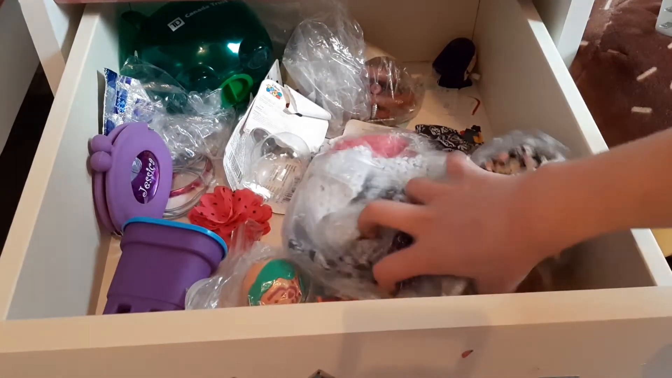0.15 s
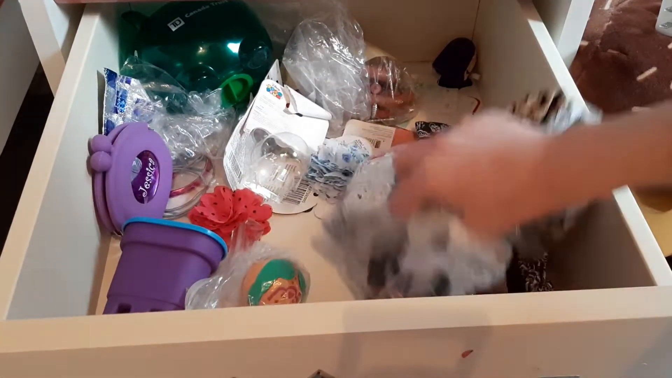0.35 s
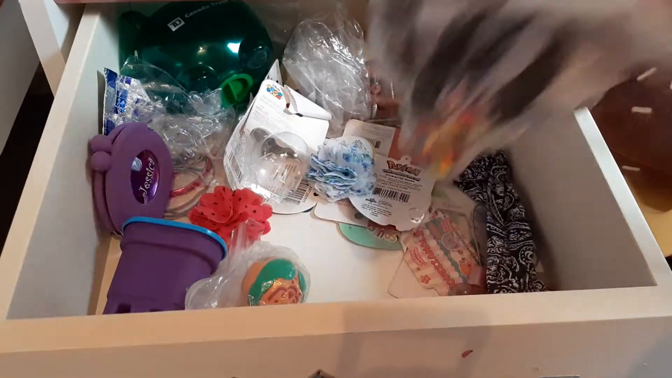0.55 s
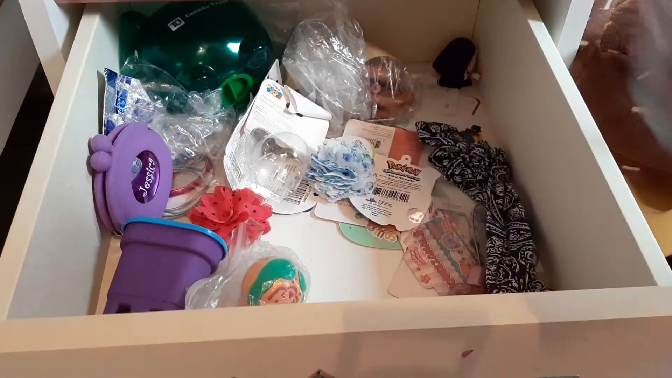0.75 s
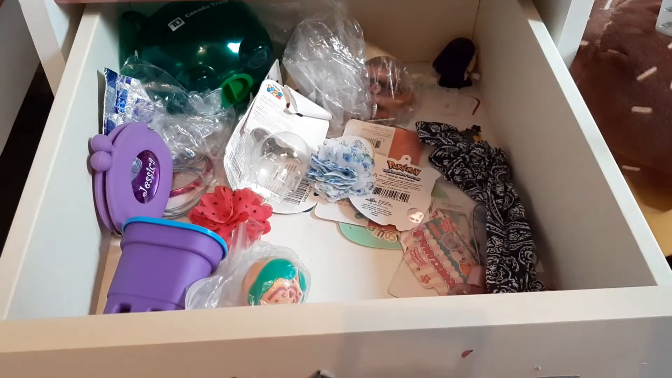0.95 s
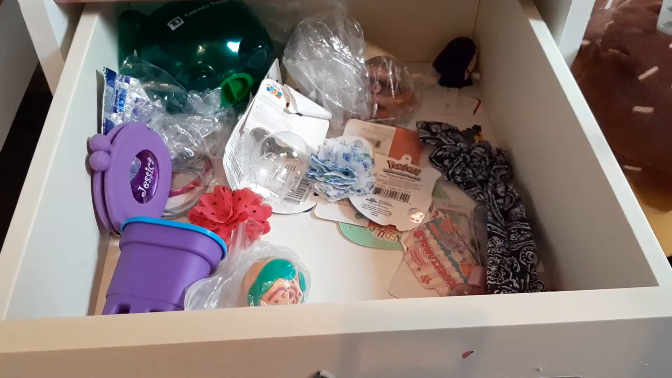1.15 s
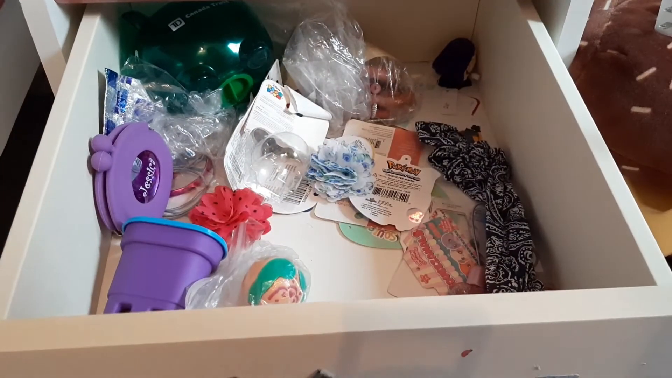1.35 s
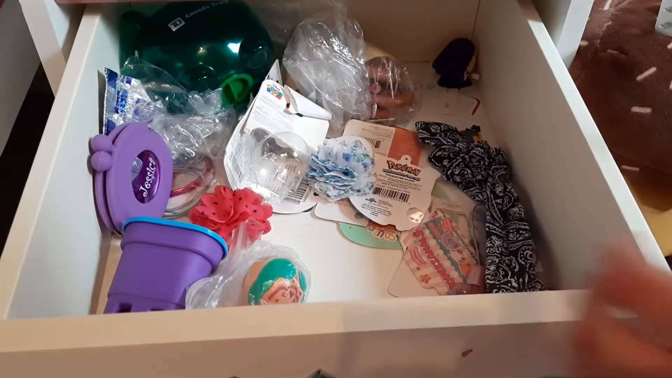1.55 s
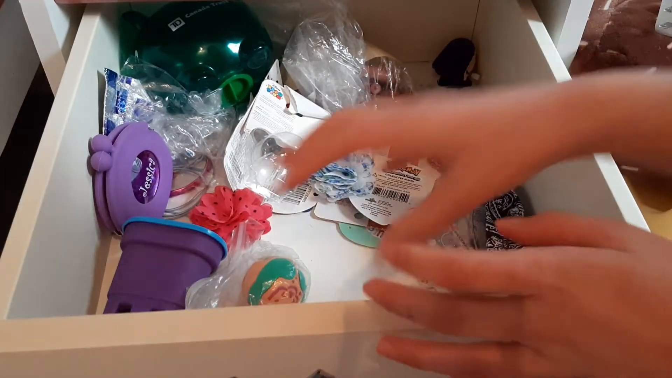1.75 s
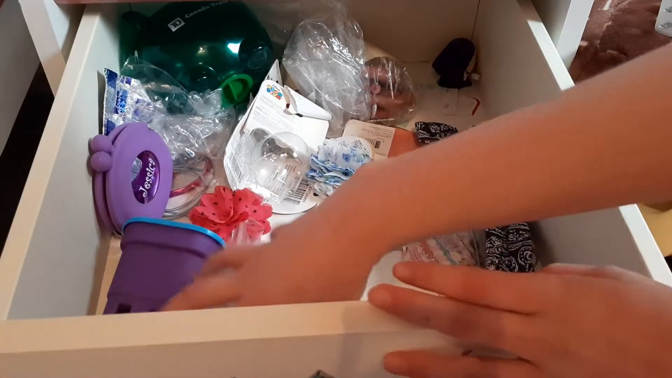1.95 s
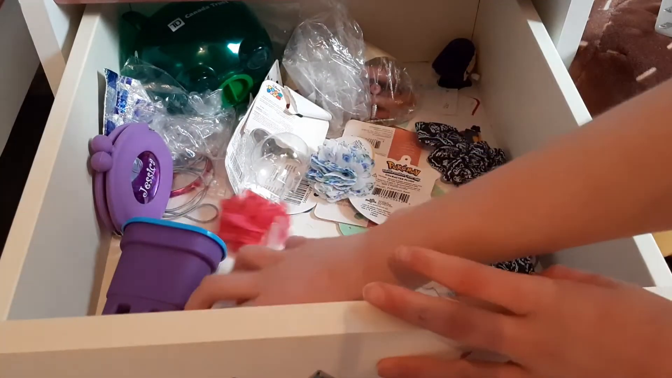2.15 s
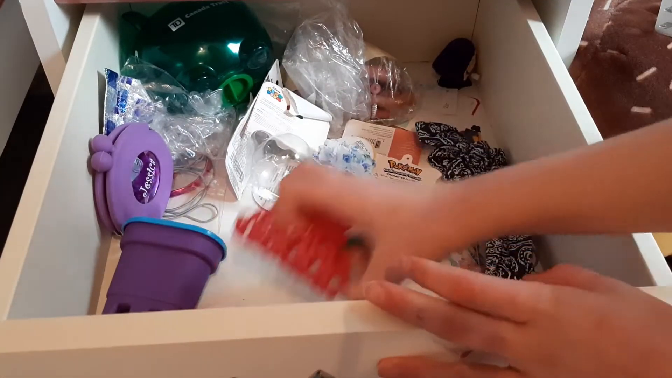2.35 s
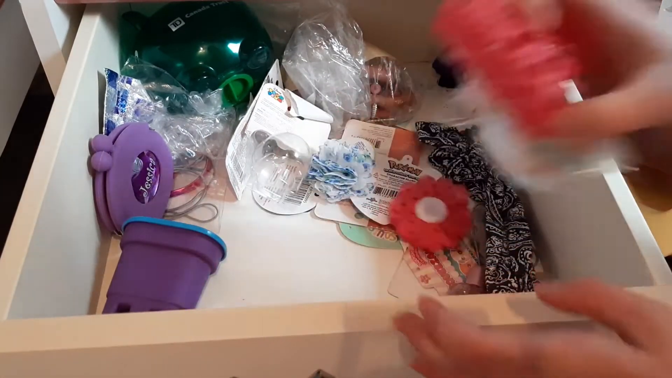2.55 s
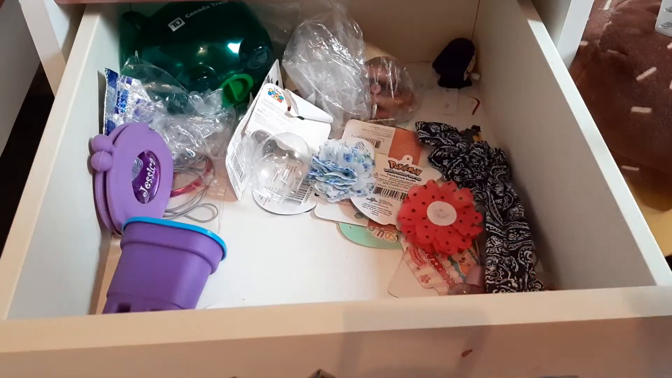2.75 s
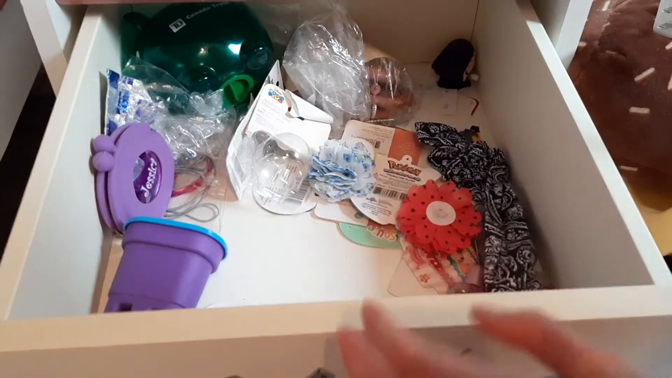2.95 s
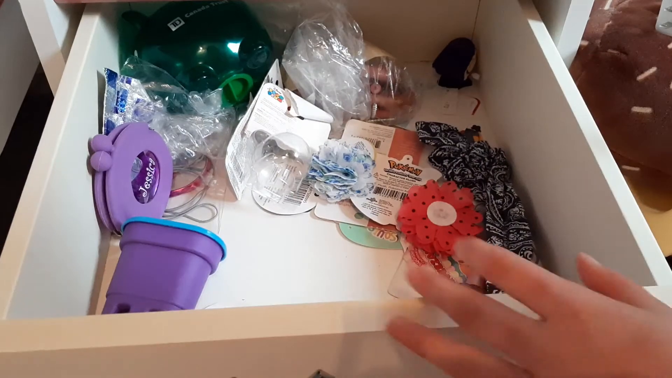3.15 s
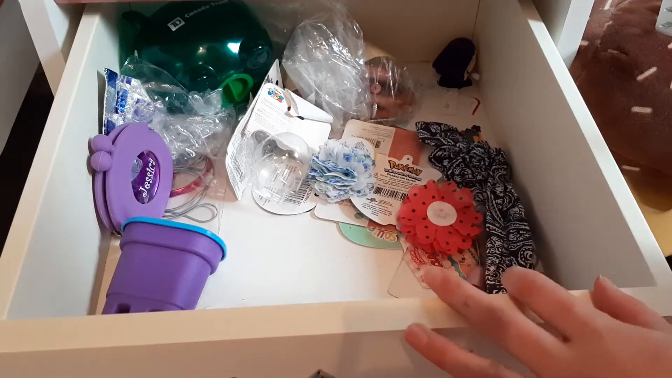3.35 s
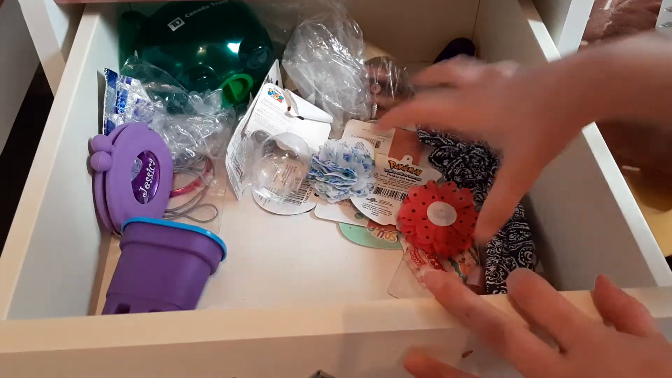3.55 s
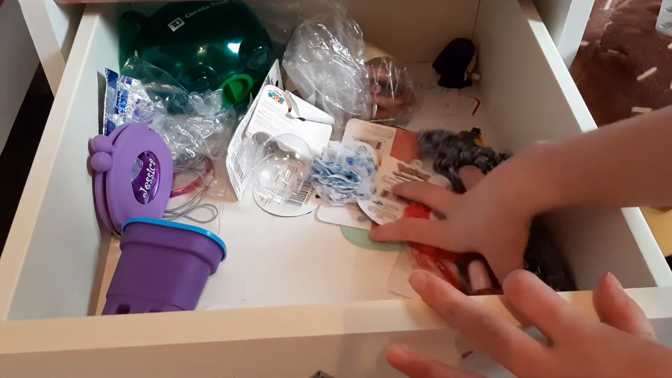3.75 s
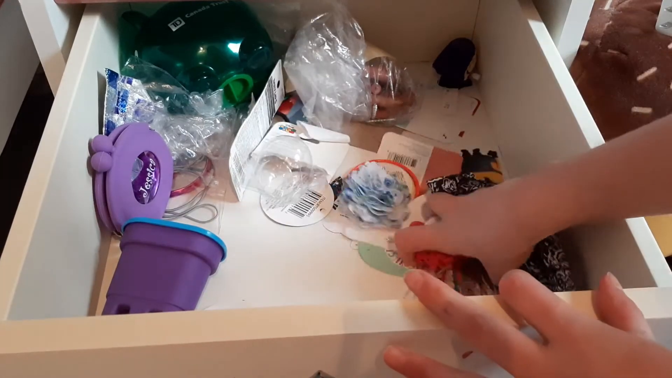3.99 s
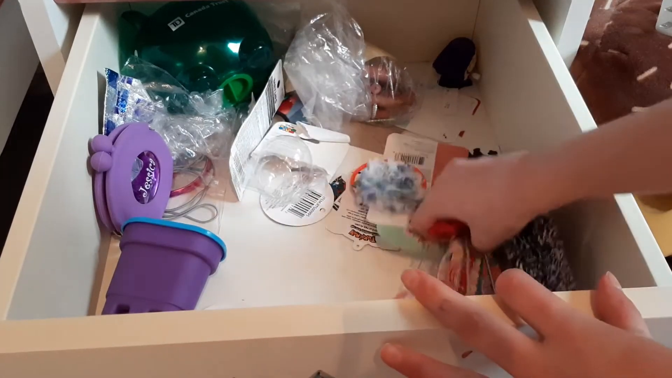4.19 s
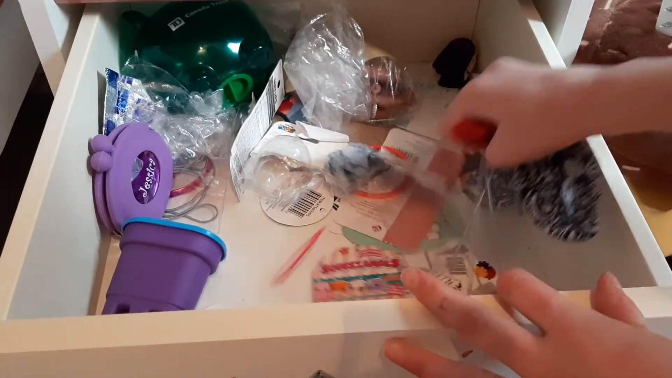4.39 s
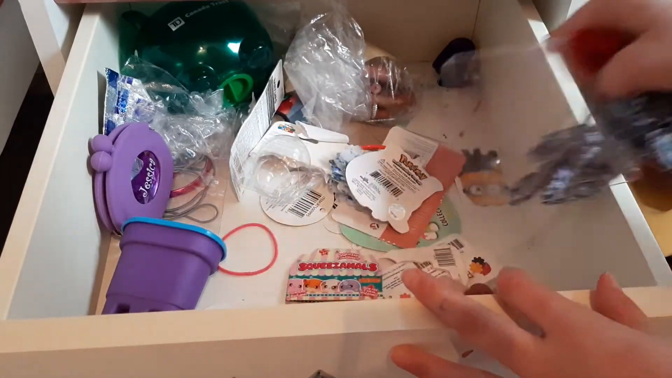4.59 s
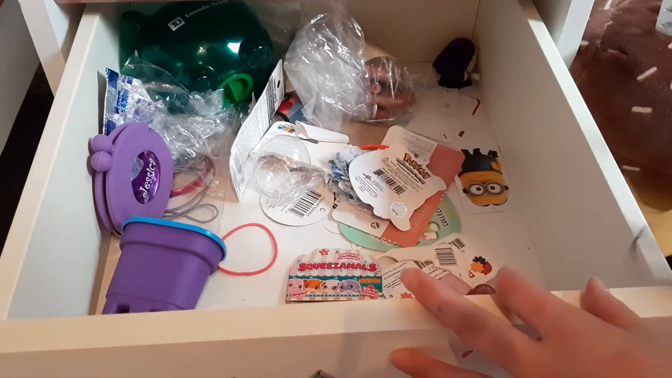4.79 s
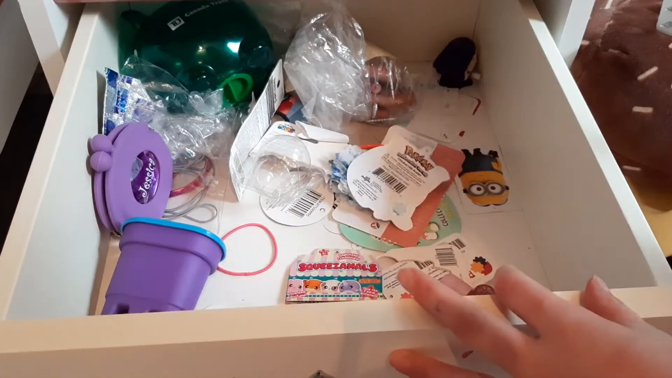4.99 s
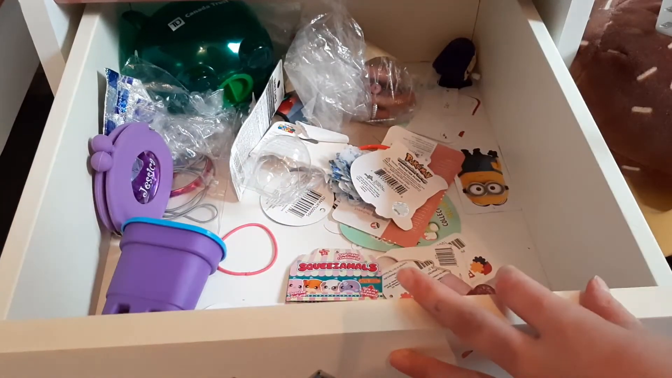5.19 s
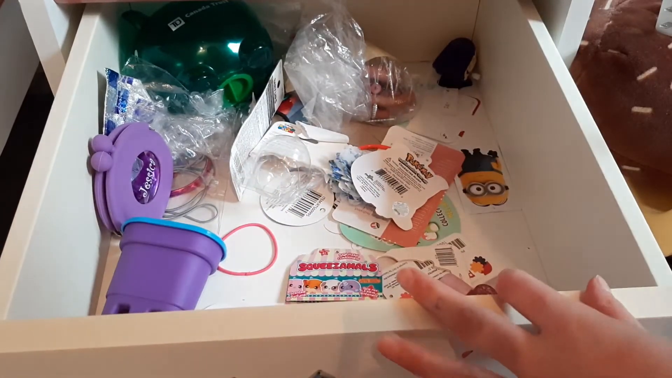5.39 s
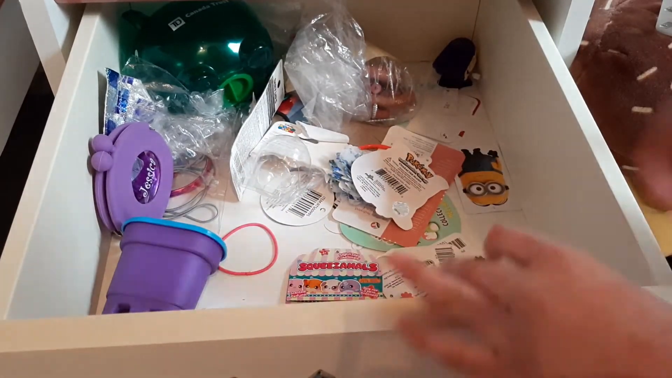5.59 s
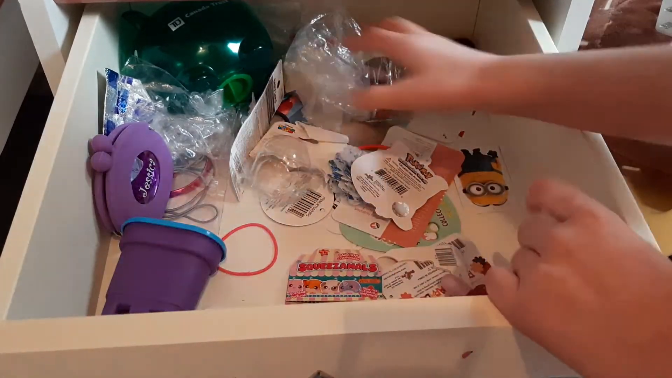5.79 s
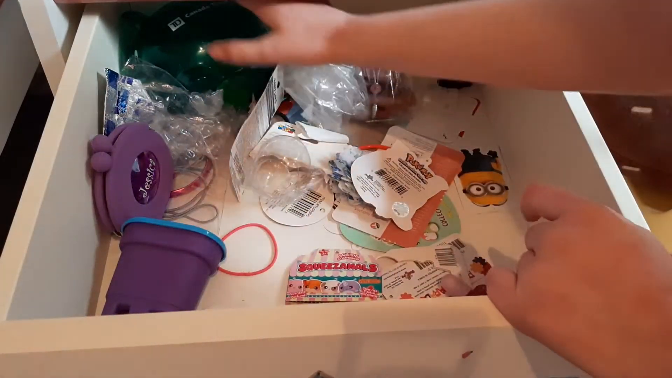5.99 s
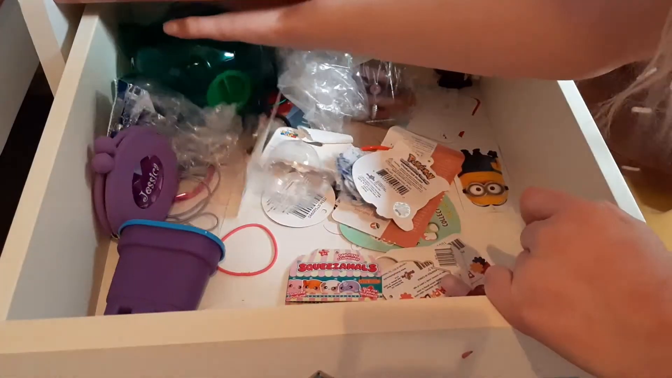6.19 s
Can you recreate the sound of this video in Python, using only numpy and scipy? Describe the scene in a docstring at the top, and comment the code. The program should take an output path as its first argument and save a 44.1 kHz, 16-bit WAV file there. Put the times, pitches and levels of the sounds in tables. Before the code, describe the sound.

Thin plastic bags swish and crinkle as hands dig through a wooden drawer. Small trinkets on backing cards then knock and scrape on the bottom in fits and starts, with dull thuds, snaps and tiny squeaks. A tossed packet lands loudly and rattles to rest. After more soft rustling, a big hollow toy is dragged with a short boom. The microphone is close, in a furnished bedroom with little echo.

```python
"""Rummaging in a wooden drawer

Close to a phone, thin plastic bags swish and crinkle and a hand brushes the drawer edge. Carded
trinkets knock and scrape on the drawer bottom, with snaps, dull thuds, squeaks and faint clicks.
A tossed packet lands and rattles to rest. Last, a big hollow toy is dragged over the wood;
stick-slip makes its shell boom. A furnished bedroom adds a short reverberation."""
import sys
import numpy as np
from scipy import signal
from scipy.fft import rfft, irfft
from scipy.io import wavfile

SR = 44100
rng = np.random.default_rng(int(sys.argv[2]) if len(sys.argv) > 2 else 0)


def master_out(mix):
    """Clip the mix to full scale and print it as 16-bit PCM to the path in sys.argv[1]."""
    frames = np.transpose(np.atleast_2d(mix))
    ceiling = np.clip(frames, -1, 1)
    pcm = np.round(ceiling * 32767).astype(np.int16)
    wavfile.write(sys.argv[1], SR, pcm)


N = 274743

# swishes of thin bags and of a hand brushing the drawer edge (near 3.1 s):
# crest t/s, level/dB, rise/s, fall/s, crush re hiss/dB, right re left/dB
SWISH_STROKES = [(0.099, -32.5, 0.023, 0.33, -12, 1.5), (0.192, -32, 0.054, 0.2, -7, -1),
                 (0.402, -32.5, 0.14, 0.11, -8.5, 0), (0.69, -45.5, 0.29, 0.34, -22.5, 3),
                 (0.865, -40, 0.055, 0.23, -17.5, 7.5), (0.953, -39, 0.11, 0.12, -14, 5),
                 (1.32, -37, 0.17, 0.17, -19.5, 2.5), (1.386, -28, 0.094, 0.071, -5.5, 0),
                 (1.56, -42, 0.27, 0.29, -14, 4.5), (3.098, -47, 0.008, 0.18, -0.5, 4),
                 (3.158, -36.5, 0.054, 0.1, -1, 1.5), (5.357, -46, 0.041, 0.48, -0.5, 1.5),
                 (5.612, -42.5, 0.25, 0.18, -2.5, 2.5), (5.849, -43.5, 0.32, 0.35, -4, 2),
                 (6.19, -45, 0.16, 0.4, -12, -5)]
# film hiss spectrum, with the phone's dip near 9 kHz: f/Hz, level/dB
FILM_EQ = [(650, -34.5), (1100, -4.5), (1900, -2), (7860, 0.5), (8870, -8), (11600, 2), (16000, 1)]
# squeezed bag spectrum: f/Hz, level/dB
CRUSH_EQ = [(30, -10.5), (160, -8), (350, -1), (470, -3), (850, -2.5), (1600, -7.5), (4000, -10)]
# stiff creases snapping over: t/s, level/dB
CREASE_SNAPS = [(0.067, -47), (2.857, -66), (3.087, -39), (3.731, -37.5), (4.16, -38), (4.232, -39.5),
                (4.408, -28.5), (5.3352, -25), (5.476, -28.5)]
# crease spectrum: f/Hz, level/dB
CREASE_EQ = [(150, -34.5), (500, -7), (3000, 0.5), (5500, 4), (9000, 1.5), (13000, 3)]
# dull thuds of hands on the drawer and of the packet landing: t/s, level/dB, f/Hz
THUDS = [(0.183, -36.5, 325), (0.793, -60.5, 73.6), (1.392, -45, 104), (1.867, -49.5, 270),
         (2.004, -46.5, 400), (2.088, -36.5, 385), (2.131, -40.5, 290), (2.178, -35, 330),
         (3.745, -40, 179), (4.485, -36, 355), (4.637, -42, 280), (4.706, -25, 320), (4.82, -24.5, 325),
         (5.873, -47, 138), (6.023, -39, 268)]
# rubbed wood spectrum: f/Hz, level/dB
WOOD_EQ = [(30, -23), (110, -9.5), (220, -8), (340, -1.5), (480, -9.5), (800, -11), (1800, -37.5)]
# trinket blows: t/s, clack/dB, thump/dB, tick/dB
TRINKET_KNOCKS = [(0.187, -35.5, -51, -42), (2.041, -36.5, -33, -41), (2.207, -40, -40.5, -31),
                  (2.417, -36.5, -50.5, -44.5), (2.44, -39.5, -46, -42), (3.765, -29, -39.5, -35.5),
                  (3.786, -37, -40.5, -43), (3.818, -33, -37, -39.5), (3.913, -26, -35, -37),
                  (3.933, -30, -36, -29), (3.951, -38.5, -50.5, -37), (4.059, -36.5, -36.5, -39),
                  (4.304, -34, -51.5, -35.5), (4.326, -22, -22.5, -29), (4.351, -34.5, -38, -48),
                  (4.384, -43, -38.5, -34.5), (4.469, -36, -37, -35), (4.508, -35, -28.5, -37),
                  (4.553, -36, -29, -45)]
# carded trinket spectrum: f/Hz, level/dB
CARD_EQ = [(380, -40.5), (650, -8.5), (1100, -1.5), (1500, 2.5), (1710, -6), (2060, 5), (2330, -6),
           (3600, -15), (7920, -59)]
# wrapper crackle spectrum, with the phone's dip near 9 kHz: f/Hz, level/dB
WRAPPER_EQ = [(1650, -25), (2800, 0.5), (6820, -3.5), (7890, -4.5), (8990, -12), (13000, -4), (16000, -13)]
# drawer bottom modes: f/Hz, level/dB, T60/s
DRAWER_MODES = [(233, -6.5, 0.07), (329, 1.5, 0.042), (392.3, 6, 0.067), (564, -3.5, 0.11),
                (733, -4.5, 0.062)]
# plastic and card squeaks: crest t/s, level/dB, f/Hz, length/s
RUB_SQUEAKS = [(0.573, -48.5, 2070, .008), (0.59, -51, 2050, 0.026), (3.855, -34, 585, 0.042),
               (4.225, -41.5, 597, 0.054)]
# pushes over the drawer bottom: start t/s, length/s, wood/dB, card/dB, wrapper/dB
PUSHES = [(1.99, 0.26, -45, -54, -54), (2.027, 0.26, -49, -46, -44), (2.323, 0.15, -57, -66, -56),
          (3.708, 0.2, -47.5, -55, -46), (3.775, 0.21, -49, -44, -43), (4.035, 0.034, -40, -44, -43.5),
          (4.158, 0.1, -51.5, -43, -47), (4.292, 0.14, -39, -39.5, -41.5), (4.455, 0.05, -38, -36, -37),
          (4.564, 0.07, -46, -54, -53.5), (6.056, 0.05, -49, -48.5, -50.5)]
# clicks of a small hard piece: t/s, level/dB
PIECE_CLICKS = [(2.675, -57), (2.744, -68), (5.114, -72.5)]
# modes of that piece: f/Hz, level/dB, T60/s
PIECE_MODES = [(2035, -8, 0.02), (3550, -1, 0.017), (4200, 1, 0.012)]
# packet landing and tumbling: t/s, blow level/dB
PACKET_LANDINGS = [(4.703, -24.5), (4.714, -16.5), (4.757, -19.5), (4.789, -22), (4.819, -18.5),
                   (4.826, -23)]
# packet modes: f/Hz, level/dB, T60/s
PACKET_MODES = [(312, 4, 0.11), (574, 0, 0.15), (890, -2, 0.08), (1143, 3, 0.11), (1450, 3, 0.06)]
# packet crack spectrum: f/Hz, level/dB
CRACK_EQ = [(100, -12.5), (1300, 2.5), (2400, -10), (7000, -23), (16000, -64.5)]
# hollow toy resonances: f/Hz, width/Hz, level/dB
TOY_RESONANCES = [(158, 37, 0.5), (434, 70, 4.5), (806, 24, -16), (1210, 34, -12), (1970, 45, -9.5)]
# room tone and microphone hiss spectrum: f/Hz, level/dB
FLOOR_EQ = [(30, 1), (130, -1.5), (800, -15.5), (5000, -16.5), (8700, -25.5), (12000, -12)]

SWEEP_DROP_DB, SWEEP_CREST_S, SWEEP_CURVE = 18.5, 0.0082, 1.087
FLUTTER_PER_S, FLUTTER_DB, CATCH_DB = 28, 2.5, 2
PAN_DB, FLOOR_DB, TOP_HZ = 1.5, -69.5, 16000


def undb(db):
    """Decibels to gain."""
    return 10 ** (np.asarray(db) / 20)


def unit(x):
    """Scale to rms 1."""
    return x / np.sqrt(np.mean(x ** 2))


def decay(t_s, t60_s):
    """Gain falling 60 dB per t60_s."""
    return np.exp(-np.log(1000) * t_s / t60_s)


def convolve(x, response):
    """Apply an impulse response, keeping the length."""
    return signal.fftconvolve(np.atleast_2d(x), np.atleast_2d(response), axes=-1)[:, :x.shape[-1]]


def colour(x, eq, size=2048):
    """Minimum-phase filter of unit energy, shaped by eq."""
    hz, db = np.transpose(eq)
    bins_hz = np.arange(size + 1) * SR / (2 * size)
    outline_db = np.interp(np.log(bins_hz + 1), np.log(hz), db)
    cepstrum = irfft(np.log(undb(outline_db)))
    cepstrum[1:size] *= 2
    cepstrum[size + 1:] = 0
    response = irfft(np.exp(rfft(cepstrum)))[:size]
    return convolve(x, response / np.linalg.norm(response))


def stereo_noise(samples, corr):
    """White noise pair with correlation corr."""
    noise = rng.standard_normal((3, samples))
    return np.sqrt(corr) * noise[0] + np.sqrt(1 - corr) * noise[1:]


def grains(per_s, spread_db, corr):
    """Random tiny slips of uneven size, rms 1."""
    slips = rng.random(N) < per_s / SR
    sizes = undb(spread_db * np.clip(rng.standard_normal(N), -2, 2))
    return unit(slips * sizes * stereo_noise(N, corr))


def wander(per_s):
    """Random course with per_s turns a second."""
    return np.interp(np.arange(N) / SR * per_s, np.arange(N), rng.standard_normal(N))


def burst(t60_s, tail_db, tail_t60_s, corr, attack_s=0.0012):
    """Short crack, then its scatter between the drawer walls."""
    t = np.arange(SR // 4) / SR
    fade = decay(t, t60_s) + undb(tail_db) * decay(t, tail_t60_s)
    return stereo_noise(len(t), corr) * fade * (1 - np.exp(-t / attack_s))


def ring(modes, scatter_db, detune):
    """Damped modes; the strike point varies their weights and pitches."""
    t = np.arange(SR // 2) / SR
    hz, db, t60_s = np.transpose(modes)[:, :, None]
    hz = hz * (1 + detune * rng.standard_normal(hz.shape))
    weights = undb(db + scatter_db * rng.standard_normal(hz.shape)) * rng.choice([-1, 1], hz.shape)
    waves = weights * np.exp(2j * np.pi * hz * t) * decay(t, t60_s)
    # higher modes reach the two microphones less in step
    mic_phases = np.exp(1j * hz.T / 1800 * rng.standard_normal((2, len(hz))))
    return (mic_phases @ waves).imag


def add(out, at_s, sound, db):
    """Mix in a sound; db is its rms over the first 10 ms."""
    start = int(at_s * SR)
    part = sound[:, :N - start]
    onset_rms = np.sqrt(np.mean(sound[:, :SR // 100] ** 2))
    out[:, start:start + part.shape[1]] += part * undb(db) / onset_rms


def sweep(crest_s, rise_s, fall_s):
    """Gain of a hand movement: speeds up, crests, dies away."""
    t = np.arange(N) / SR - crest_s
    away_s = np.hypot(t, SWEEP_CREST_S) - SWEEP_CREST_S
    flank = np.minimum(away_s / np.where(t < 0, rise_s, fall_s), 10)
    return undb(-SWEEP_DROP_DB * flank ** SWEEP_CURVE)


def shove(start_s, length_s, attack_s=0.014, t60_s=0.22):
    """Gain of a push: quick grip, hold, run-out."""
    t = np.arange(N) / SR - start_s
    return np.clip(t / attack_s, 0, 1) * decay(np.maximum(t - length_s, 0), t60_s)


def power_sum(gains):
    """Joint gain of overlapping movements."""
    return np.sqrt(sum(gain ** 2 for gain in gains))


def catching():
    """Gain of rubbing that catches and lets go."""
    return undb(CATCH_DB * wander(FLUTTER_PER_S))


def flutter(x, octaves):
    """Shifting folds: each top octave wanders in level on its own."""
    out = 0
    for octave in range(octaves):
        lowpass = signal.butter(2, TOP_HZ / 2 ** (octave + 1), fs=SR, output="sos")
        below = signal.sosfiltfilt(lowpass, x)
        out = out + (x - below) * undb(FLUTTER_DB * wander(FLUTTER_PER_S))
        x = below
    return out + x


def swishes(crinkle_db=-31.5):
    """Bags rub, a hand brushes the drawer edge: hiss, crinkle when slow, body at the crest."""
    film = colour(grains(per_s=SR, spread_db=1, corr=0.01), FILM_EQ)
    creases = colour(grains(per_s=310, spread_db=2, corr=0.053), FILM_EQ)
    crush = colour(grains(per_s=6200, spread_db=1.5, corr=0.49), CRUSH_EQ)
    rubs, squeezes = [], []
    for crest_s, db, rise_s, fall_s, crush_db, right_db in SWISH_STROKES:
        speed = sweep(crest_s, rise_s, fall_s)
        rubs.append(speed * undb(db + np.array([[-right_db], [right_db]]) / 2))
        squeezes.append(rubs[-1] * undb(crush_db) * speed ** 0.3)
    rub = power_sum(rubs)
    hiss = rub * np.sqrt(catching()) * flutter(film, octaves=4)
    crinkle = undb(crinkle_db) * np.sqrt(rub) * creases
    return hiss + crinkle + power_sum(squeezes) * crush


def crease_snaps():
    """Creases in stiff wrapping snap over."""
    out = np.zeros((2, N))
    for at_s, db in CREASE_SNAPS:
        snap = burst(t60_s=0.019, tail_db=-19, tail_t60_s=0.11, corr=0.2)
        add(out, at_s, colour(snap, CREASE_EQ), db)
    return out


def dull_thuds(rise_cycles=0.98, scuff_db=-8.5):
    """A hand on the drawer or the landing packet thuds for a few cycles and scuffs the wood."""
    out = np.zeros((2, N))
    for at_s, db, hz in THUDS:
        cycles = hz * np.arange(SR // 4) / SR
        thud = np.sin(2 * np.pi * cycles) * cycles / rise_cycles * np.exp(1 - cycles / rise_cycles)
        add(out, at_s, np.tile(thud, (2, 1)), db)
        scuff = burst(t60_s=0.053, tail_db=-3.5, tail_t60_s=0.43, corr=0.96)
        add(out, at_s, colour(scuff, WOOD_EQ), db + scuff_db)
    return out


def trinket_eq(size_scatter=0.069):
    """Spectrum of one trinket; its random size shifts the pitch."""
    return np.array(CARD_EQ) * [np.exp(size_scatter * rng.standard_normal()), 1]


def trinket_knocks(rebound_s=0.016, rebound_db=-23, board_rise_s=0.0034):
    """Each blow clacks, ticks and thumps the heavy drawer bottom; the trinket hops once."""
    out = np.zeros((2, N))
    for at_s, clack_db, thump_db, tick_db in TRINKET_KNOCKS:
        eq = trinket_eq()
        for delay_s, hop_db in ((0, 0), (rebound_s, rebound_db)):
            clack = burst(t60_s=0.021, tail_db=-17, tail_t60_s=0.1, corr=0.55)
            add(out, at_s + delay_s, colour(clack, eq), clack_db + hop_db)
        tick = burst(t60_s=0.018, tail_db=-16, tail_t60_s=0.09, corr=0.25)
        add(out, at_s, colour(tick, WRAPPER_EQ), tick_db)
        board = ring(DRAWER_MODES, scatter_db=2, detune=0.038)
        onset = 1 - np.exp(-np.arange(board.shape[1]) / SR / board_rise_s)
        add(out, at_s, board * onset, thump_db)
    return out


def squeaks(waver_hz=130, waver_per_s=600):
    """A smooth surface catches and sings briefly at an unsteady pitch."""
    t = np.arange(N) / SR
    out = np.zeros((2, N))
    for crest_s, db, hz, length_s in RUB_SQUEAKS:
        cycles = np.cumsum(hz + waver_hz * wander(waver_per_s)) / SR
        swell = np.exp(-(2 * (t - crest_s) / length_s) ** 2)
        out += undb(db) * swell * np.sin(2 * np.pi * cycles)
    return out


def scrapes():
    """Stick-slip: the board rumbles, backing cards rasp, wrappers crackle."""
    pushes = [shove(start_s, length_s) * undb(db)[:, None] for start_s, length_s, *db in PUSHES]
    wood_gain, _, wrapper_gain = power_sum(pushes)
    wood = colour(grains(per_s=700, spread_db=2, corr=0.87), WOOD_EQ) * wood_gain
    card = sum(colour(grains(per_s=1000, spread_db=1.5, corr=0.1), trinket_eq()) * card_gain
               for _, card_gain, _ in pushes)
    wrapper = colour(grains(per_s=5000, spread_db=3.5, corr=0.05), WRAPPER_EQ) * wrapper_gain
    return (wood + card + wrapper) * catching()


def clicks(tick_db=5):
    """A tap rings a small hard piece, with a bright tick."""
    out = np.zeros((2, N))
    for at_s, db in PIECE_CLICKS:
        tap = burst(t60_s=0.035, tail_db=-13, tail_t60_s=0.18, corr=0.3)
        add(out, at_s, convolve(tap, ring(PIECE_MODES, scatter_db=0, detune=0)), db)
        add(out, at_s, colour(tap, WRAPPER_EQ), db + tick_db)
    return out


def chatter(hops, start_s=4.861, start_db=-22.5, gap_s=0.025, gap_ratio=0.9, loss_db=2.5):
    """Uneven hops, tending faster and each weaker: t/s, blow level/dB."""
    hop = np.arange(hops)
    gaps_s = gap_s * gap_ratio ** hop * np.exp(rng.standard_normal(hops) / 10)
    return list(zip(start_s + np.cumsum(gaps_s) - gaps_s, start_db - loss_db * hop))


def tossed_packet(ring_db=-11, crack_db=-8.5, crack_growth=1.31):
    """Lands and chatters to rest; the crack grows faster than the blow, so weak hops are dull."""
    out = np.zeros((2, N))
    for at_s, blow_db in list(PACKET_LANDINGS) + chatter(hops=7):
        crack = burst(t60_s=0.028, tail_db=-16, tail_t60_s=0.18, corr=0.4)
        add(out, at_s, ring(PACKET_MODES, scatter_db=4, detune=0.0014), blow_db + ring_db)
        add(out, at_s, colour(crack, CRACK_EQ), crack_db + crack_growth * blow_db)
    return out


def dragged_toy(slip_hz=150, jitter=0.09, grit_db=-1, level_db=-24.5):
    """Stick-slip jerks boom in the hollow shell; grit rings its higher resonances."""
    t = np.arange(SR // 2) / SR
    shell = sum(undb(db) * width_hz / hz * np.exp(-np.pi * width_hz * t) * np.sin(2 * np.pi * hz * t)
                for hz, width_hz, db in TOY_RESONANCES)
    cycles = np.cumsum(slip_hz * (1 + jitter * wander(slip_hz))) / SR
    slips = unit(np.diff(np.floor(cycles), prepend=0))
    jerks = signal.sosfilt(signal.butter(2, 2 * slip_hz, fs=SR, output="sos"), slips)
    grit = undb(grit_db) * grains(per_s=890, spread_db=-1.5, corr=0.66)
    boom = convolve(jerks + grit, np.diff(shell))  # radiates by velocity: no deep bass
    pull = sweep(crest_s=6.182, rise_s=0.27, fall_s=0.21) * shove(start_s=6.124, length_s=1)
    return undb(level_db) * unit(boom) * pull


def bedroom_reverb(x, t60_s=0.27, predelay_s=0.006, level_db=-8):
    """Short diffuse tail of a furnished room."""
    t = np.arange(SR // 2) / SR
    tail = rng.standard_normal((2, len(t))) * decay(t, t60_s) * (t > predelay_s)
    tail = colour(tail, [(200, -9), (900, -8.5)])
    return undb(level_db) * convolve(x, tail / np.linalg.norm(tail[0]))


def scene():
    """Drawer nearer the right microphone (louder, sooner), packet beside it, reverb, noise floor."""
    left, right = (swishes() + scrapes() + trinket_knocks() + crease_snaps() + dull_thuds()
                   + clicks() + squeaks() + dragged_toy())
    left = np.r_[np.zeros(3), left[:-3]]
    direct = np.array([left * undb(-PAN_DB), right * undb(PAN_DB)]) + tossed_packet()
    floor = undb(FLOOR_DB) * colour(stereo_noise(N, corr=0.12), FLOOR_EQ)
    return direct + bedroom_reverb(direct) + floor


def record(dry):
    """The phone thins the deepest bass and cuts the very top."""
    highpass = signal.butter(2, 48, "high", fs=SR, output="sos")
    lowpass = signal.ellip(10, 0.2, 70, TOP_HZ, fs=SR, output="sos")
    return signal.sosfilt(lowpass, signal.sosfilt(highpass, dry))


dry = scene()
out = record(dry)
master_out(out)
```